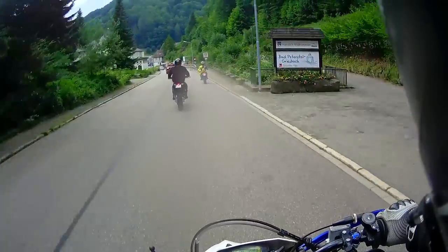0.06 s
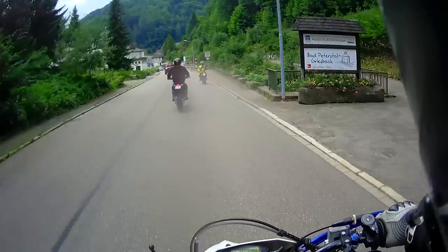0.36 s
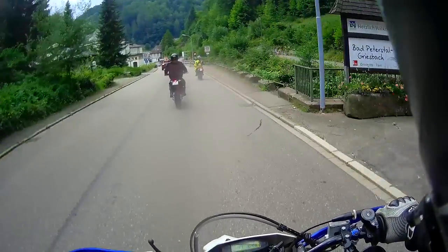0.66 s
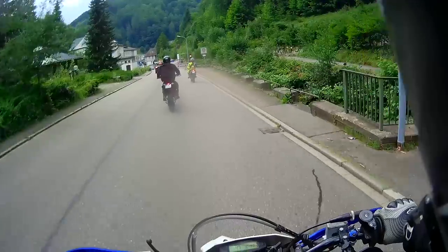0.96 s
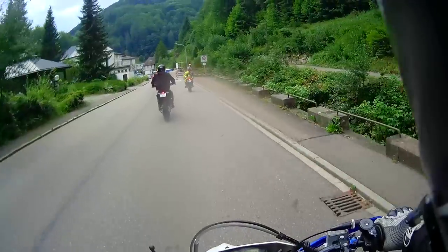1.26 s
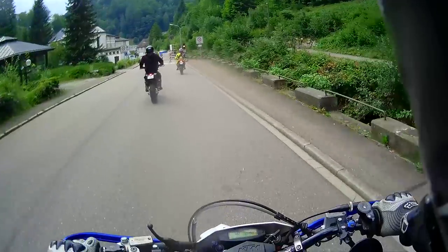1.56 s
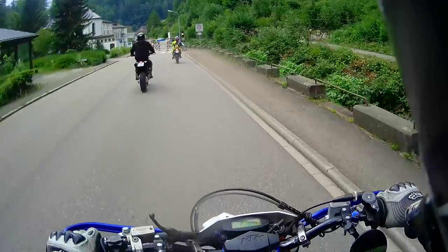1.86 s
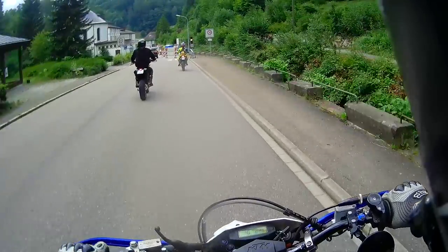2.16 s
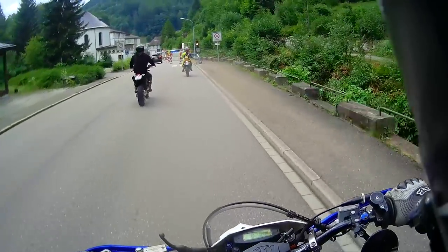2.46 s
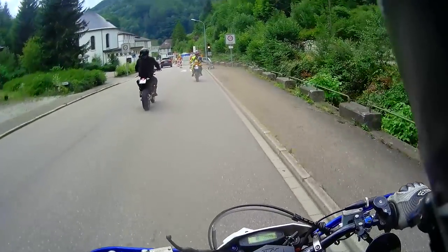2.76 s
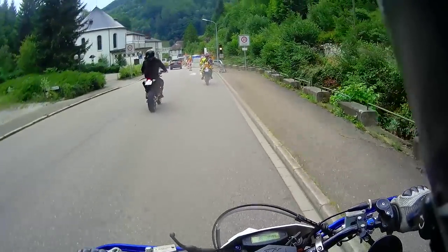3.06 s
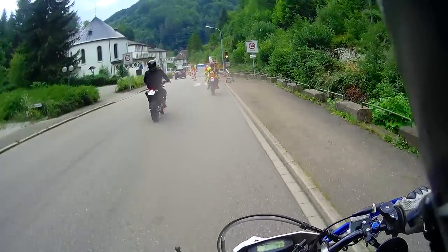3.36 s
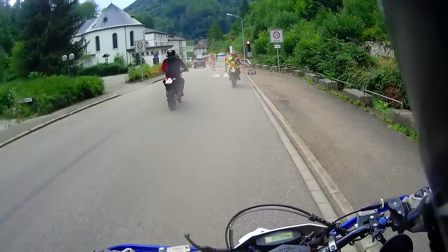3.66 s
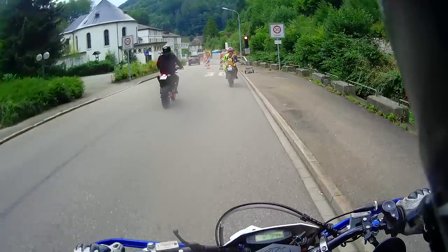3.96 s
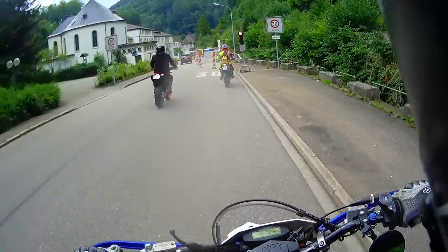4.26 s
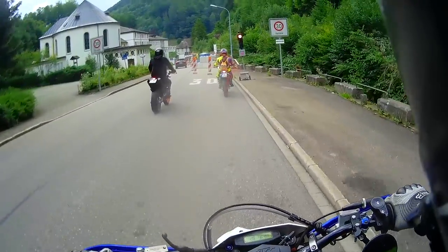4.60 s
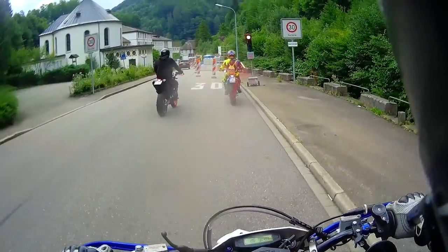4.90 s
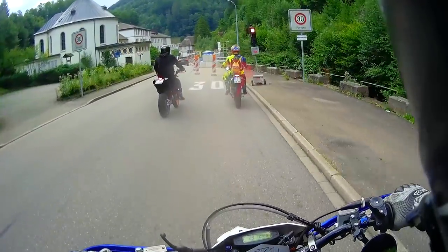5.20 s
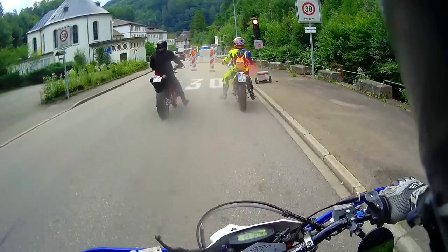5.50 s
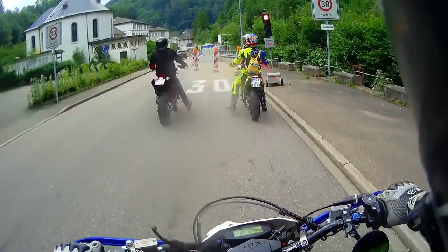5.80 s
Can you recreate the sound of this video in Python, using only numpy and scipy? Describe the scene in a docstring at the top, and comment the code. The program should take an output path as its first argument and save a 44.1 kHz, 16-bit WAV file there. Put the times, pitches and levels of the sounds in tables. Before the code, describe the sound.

Wind rumbles around a helmet microphone over the close, pulsing exhaust of a motorcycle riding slowly down a street. The engine dips, bangs twice as it picks up, and then gradually loses speed, its valves and chain clattering lightly. Brief revs and a thin, faint whine come from a second bike in front. The throttle shuts and the engine settles into a slow, thumping idle alongside the other machine.

```python
"""A steady exhaust beat and a rumble of wind: a single-cylinder four-stroke motorcycle cruises, heard
from the rider's helmet. The throttle opens with two sharp bangs, then the engine runs down and idles.
Each firing is a pulse of gas that rings the resonances of the pipes, over the rattle of valves and chain.
A motorcycle just ahead blips its throttle, whines from its gears as it slows, and idles."""
import sys
import numpy as np
from scipy import signal
from scipy.fft import rfft, irfft, next_fast_len
from scipy.io import wavfile
from scipy.ndimage import map_coordinates

SR = 44100
rng = np.random.default_rng(int(sys.argv[2]) if len(sys.argv) > 2 else 0)


def persist_wave(psi):
    """Save psi, clipped to +-1, as 16-bit WAV."""
    counts = np.round(np.clip(psi, -1, 1) * 32767).astype(np.int16)
    wavfile.write(sys.argv[1], SR, np.atleast_2d(counts).T)


N = 266364
TIME = np.arange(N) / SR


def amp(db):
    """The decibel scale: 20 dB is a factor of ten in amplitude."""
    return 10 ** (np.asarray(db) / 20)


def unit(x):
    """Normalisation to an rms of 1."""
    return x / np.sqrt(np.mean(x ** 2) + 1e-20)


def curve(rows, at=TIME):
    """Linear interpolation between (time, value) rows."""
    return np.interp(at, *np.transpose(rows))


def wobble(rate):
    """Slow random modulation: a spline through rate random knots a second."""
    return map_coordinates(rng.standard_normal(int(N * rate / SR) + 4), [TIME * rate])


def filtered(x, response):
    """Linear filtering: the spectrum of x is multiplied by a frequency response."""
    size = next_fast_len(N + SR // 2)
    return irfft(rfft(x, size) * response(np.fft.rfftfreq(size, 1 / SR)), size)[:N]


def colour(x, spectrum):
    """Spectral shaping by (Hz, dB) points joined on a logarithmic frequency axis."""
    hz, db = np.transpose(spectrum)
    return filtered(x, lambda f: amp(np.interp(np.log(f + 1), np.log(hz), db)))


def ring(x, modes, order=1):
    """Superposition of (Hz, width Hz, dB) resonances; a higher order deepens the valleys between."""
    return filtered(x, lambda f: sum(
        amp(db) * (1j * f * width / (hz * hz - f * f + 1j * f * width)) ** order
        for hz, width, db in modes))


def noise(spectrum):
    """Coloured noise: white noise shaped to a spectrum, at an rms of 1."""
    return unit(colour(rng.standard_normal(N), spectrum))


def puffs(times, sizes, widths):
    """A train of Gaussian pulses; widths are standard deviations in seconds."""
    index = np.round(times * SR).astype(int)[:, None] + np.arange(-SR // 100, SR // 100)
    offset = (index / SR - times[:, None]) / np.reshape(widths, (-1, 1))
    bells = np.reshape(sizes, (-1, 1)) * np.exp(-.5 * offset ** 2)
    inside = (index >= 0) & (index < N)
    return np.bincount(index[inside], bells[inside], N)


def fading(x, life_s):
    """Exponential decay: every pulse gains a tail that falls to 1/e in life_s."""
    keep = np.exp(-1 / (life_s * SR))
    return signal.lfilter([1 - keep], [1, -keep], x)


# Engine speed. Each row: time in seconds, firing rate in Hz.
FIRING_RATE = [(0, 31.56), (0.91, 29.51), (1.19, 29.19), (1.41, 26.17), (1.55, 37.05), (1.68, 39.86),
               (2.98, 33.6), (3.8, 29.1), (4.13, 24.37), (4.41, 17.01), (4.77, 13.32), (6.04, 12.57)]
def revs(cruise_hz=32):
    """Engine speed as a frequency ratio, in octaves above cruise."""
    return np.log2(curve(FIRING_RATE) / cruise_hz)


# Spectrum of the wind. Each row: frequency in Hz, relative level in dB.
WIND_SPECTRUM = [(15, -8), (35, -1), (70, 0.5), (130, -1), (250, -2), (340, -7), (460, -16), (580, -30.5),
                 (1000, -32.5), (3000, -62)]
def wind(cruise_db=-37.5, db_per_octave=8, gust_db=2):
    """Flow noise: air and road rumble round the helmet, dropping as the engine slows."""
    return amp(cruise_db + db_per_octave * revs() + gust_db * wobble(14)) * noise(WIND_SPECTRUM)


# Surges of gear whine ahead. Each row: time of the top in seconds, pitch there in Hz,
# length of the fall in seconds, level in dB.
WHINE_SURGES = [(2.84, 1175, 0.22, -57), (3.92, 1175, 0.3, -56), (4.26, 1115, 0.38, -58),
                (5.24, 1229, 0.7, -57.5)]
def surges(rise_hz_per_s=400, sink_hz_per_s=280, rise_share=0.55, fade_db=10):
    """Frequency glides: each surge climbs, then sinks and fades; the loudest sets pitch and level."""
    top_s, top_hz, fall_s, top_db = np.transpose(WHINE_SURGES)[:, :, None]
    before, after = np.maximum(top_s - TIME, 0), np.maximum(TIME - top_s, 0)
    hz = top_hz - rise_hz_per_s * before - sink_hz_per_s * after
    db = top_db - fade_db * ((before / rise_share + after) / fall_s) ** 2
    return np.choose(db.argmax(axis=0), hz), db.max(axis=0)


def whine_ahead(sideband_db=-4.5, spacing_hz=38, shimmer_db=2.8, drone_db=1, octave_db=-19):
    """Modulation sidebands: the gears ahead sing in a cluster of close lines over an exhaust drone."""
    hz, db = surges()
    mesh = 2 * np.pi * np.cumsum(hz * (1 + .014 * wobble(220))) / SR
    turn = 2 * np.pi * np.cumsum(spacing_hz * hz / np.average(hz, weights=amp(db))) / SR
    lines = sum(np.sin(mesh + k * turn + 0.93 * wobble(14))
                * amp(sideband_db * abs(k) + shimmer_db * wobble(20)) for k in range(-3, 4))
    song = unit(lines + amp(octave_db) * np.sin(2 * mesh))
    drone = sum(np.sin(k * turn + rng.uniform(0, 2 * np.pi)) * amp(4.8 * wobble(6))
                for k in range(8, 13))
    return amp(db) * (song + amp(drone_db) * unit(drone))


# Throttle blips ahead. Each row: centre in seconds, length in seconds, pitch in Hz, level in dB.
THROTTLE_BLIPS = [(2.335, 0.043, 287.5, -35), (2.634, 0.12, 276.8, -36.5), (3.765, 0.1, 234, -35),
                  (4.2, 0.15, 249.6, -46.5), (4.938, 0.12, 247, -37), (5.128, 0.1, 248.6, -37.5)]
def blips_ahead(burble=0.59, overtone_db=-13, rough_db=-9):
    """Amplitude modulation: the exhaust ahead burbles briefly at each twist of its throttle."""
    out = np.zeros(N)
    gas = noise([(100, -20), (200, 3.0), (290, 14.5), (450, -20.0), (600, -23), (1500, -48)])
    for centre, length, hz, db in THROTTLE_BLIPS:
        phase = 2 * np.pi * np.cumsum(hz * (1 + 0.03636 * wobble(60))) / SR
        firing = 1 + burble * np.sin(phase / 5)
        note = firing * (np.sin(phase) + amp(overtone_db) * np.sin(1.8 * phase) + amp(rough_db) * gas)
        out += amp(db) * np.exp(-((TIME - centre) / (length / 2)) ** 4) * unit(note)
    return out


# Tone of both exhausts. Each row: frequency in Hz, gain in dB.
THUMP_RESPONSE = [(20, -29), (32, -21), (50, -5.5), (75, -4), (110, -2), (160, -3), (300, 1.5), (450, 4),
                  (650, -5.5), (1200, 17)]
def thump(flow):
    """Source and filter: a fixed response shapes pulses of flow into exhaust thumps."""
    return colour(flow, THUMP_RESPONSE)


# Modes of the silencer ahead. Each row: frequency in Hz, bandwidth in Hz, gain in dB.
AHEAD_MODES = [(123, 33, -4), (217.5, 37, 6.5), (336, 78, 1)]
def idle_ahead(rate_hz=13.24, second_beat=0.87, near_s=4.95, near_db=-30, approach_db_per_s=29):
    """Pulse-driven resonance: double beats ring the silencer ahead, louder as it comes near."""
    times = np.arange(4.342, 6.04, 1 / rate_hz)
    level_db = near_db - approach_db_per_s * np.maximum(near_s - times, 0)
    size = amp(level_db + rng.standard_normal(len(times)))
    flow = puffs(times, size, 0.00099) + puffs(times + 0.0141, size * second_beat, 0.0012)
    return thump(flow + ring(flow, AHEAD_MODES))


# Spectrum of the clatter. Each row: frequency in Hz, relative level in dB.
CLATTER_SPECTRUM = [(200, -23), (550, -6), (830, 0), (1130, 0), (1300, -2.5), (1500, -3), (1750, -6.5),
                    (2150, -17), (2600, -13.5), (3600, -24), (6000, -33.5), (12000, -71)]
def clatter(cycle, cruise_db=-54.5, db_per_octave=5.5, depth_db=2, grain_db=2.0):
    """Modulated noise: valve gear and chain rattle with each turn of the crank, louder at speed."""
    beat = amp(depth_db * np.cos(4 * np.pi * cycle) + grain_db * wobble(170))
    return amp(cruise_db + db_per_octave * revs()) * unit(beat * noise(CLATTER_SPECTRUM))


# Slaps of the drive chain. Each row: time in seconds, level in dB.
CHAIN_SLAPS = [(1.543, -28.5), (1.573, -26), (2.042, -32), (2.495, -38.5), (2.777, -35.5), (3.427, -35.5),
               (4.244, -40.5), (5.7, -46.5), (5.778, -50), (6.002, -48)]
def chain(gain_db=6, life_s=0.0054):
    """Damped impacts: the slack chain slaps its guide in short bursts of noise."""
    times, db = np.transpose(CHAIN_SLAPS)
    clack = noise([(300, -45), (600, -0.5), (900, 2.0), (1300, -4.5),
                   (2000, -17.5), (3300, -21), (4200, -39), (9000, -62)])
    return fading(puffs(times, amp(db + gain_db), 0.00096), life_s) * clack


# Engine load. Each row: time in seconds, level of an ordinary firing in dB.
ENGINE_LOAD = [(0, -16.5), (1.1, -17.5), (1.42, -20), (1.62, -15), (2.4, -16), (3.25, -16.5), (3.8, -19.5),
               (4.33, -23), (4.52, -29.5), (4.9, -25.5), (6.04, -23.5)]
def airbox(cycle, tuned_hz=153, half_width_hz=17, hum_db=-16, waver_db=1.7, build_s=0.083):
    """Forced resonance: the intake drone builds as the 4th or 5th firing harmonic nears its tuning."""
    rate = curve(FIRING_RATE)
    drone = np.zeros(N)
    for harmonic, weight in (4, 1), (5, .4):
        match = 1 / (1 + ((harmonic * rate - tuned_hz) / half_width_hz) ** 2)
        drone += weight * np.cos(2 * np.pi * harmonic * cycle) * fading(match, build_s)
    return amp(curve(ENGINE_LOAD) + hum_db + waver_db * wobble(12)) * drone


def knocks(times, period, idle, ignition_db=-30, piston_db=-34, scatter_db=4.0):
    """Structure-borne sound: the piston shakes the cases at ignition, and at idle again going down."""
    chance = amp(scatter_db * rng.standard_normal((len(times), 2)))
    ignition = puffs(times - period / 4, amp(ignition_db) * chance[:, 0], 0.001)
    return ignition + puffs(times - period / 10, amp(piston_db) * chance[:, 1] * idle, 0.0012)


# Modes of header pipe and engine cases. Each row: frequency in Hz, bandwidth in Hz, gain in dB.
METAL_MODES = [(732, 92, 9.5), (845, 190, 16.5), (995, 87, -17), (1454, 87, 6), (1562, 166, 9.5),
               (2518, 174, 2), (2796, 580, -6), (4110, 120, -9), (5260, 350, -49)]
def rasp(times, rasp_db, rush_db=-13, tail_db=-10, life_s=0.0079):
    """Noise-driven resonance: gas rushes through the header at each stroke and rings the metal."""
    gate = puffs(times - .0003, amp(rasp_db), 0.0022)
    envelope = amp(rush_db) * gate + amp(tail_db) * fading(gate, life_s)
    return envelope * unit(ring(rng.standard_normal(N), METAL_MODES, order=2))


# Barking modes of the header pipe. Each row: frequency in Hz, bandwidth in Hz, gain in dB.
HEADER_MODES = [(960, 700, 1.5), (1468, 340, 7), (2652, 310, 0), (3950, 350, -44), (5260, 360, -13)]
def bark(times, rasp_db, gain_db=11, vary_db=3.5):
    """Impulse response: each stroke rings the header's modes in a different balance."""
    sizes = amp(rasp_db[:, None] + gain_db + vary_db * rng.uniform(-1.1, 1, (len(times), len(HEADER_MODES))))
    starts = times[:, None] - rng.uniform(0.00048, 0.001502, sizes.shape)
    return sum(ring(puffs(starts[:, k], sizes[:, k], .00005), [mode], order=2)
               for k, mode in enumerate(HEADER_MODES))


# Spectrum of a bang's spit. Each row: frequency in Hz, relative level in dB.
SPIT_SPECTRUM = [(500, -20), (1400, 5), (2050, -1), (2600, 9), (3400, -5), (4050, 2), (4700, -12),
                 (5350, -1.5), (7000, -10), (14000, -25)]
def spit(times, rasp_db, gain_db=-16):
    """Nonlinear growth: treble rises as the cube of the rasp, so only the hardest bangs spit."""
    violence = amp(rasp_db - np.max(rasp_db)) ** 2
    return puffs(times, amp(rasp_db + gain_db) * violence, 0.0013) * noise(SPIT_SPECTRUM)


def bang_ring(times, size, excess_db, hz=235, width_hz=60, ring_db=3):
    """Free vibration: a charge that burns harder than usual leaves the silencer ringing."""
    blow = puffs(times - .0005, size * np.clip((excess_db - 1) / 5, 0, 1), 0.0003)
    return ring(blow, [(hz, width_hz, ring_db)])


# Firings that bang or crack. Each row: time in seconds, thump level in dB, rasp level in dB.
HARD_FIRINGS = [(0.316, -16.5, -36.5), (0.511, -14.5, -35), (0.879, -16, -38), (0.911, -17.5, -36),
                (1.014, -15.5, -32), (1.472, -8, -21), (1.502, -10.5, -24.5), (1.763, -12, -31),
                (1.814, -11.5, -29.5), (1.891, -12, -29.5), (1.968, -11.5, -26.5), (2.18, -11.5, -26.5),
                (2.342, -12, -36), (2.423, -13, -36), (2.705, -13, -33.5), (2.762, -15, -34.5),
                (3.334, -15.5, -36.5), (3.83, -20.5, -39), (4.264, -19, -45)]
def firings(cycle, scatter_db=1.48, rebound=0.65, lean_db=1.5, lead_s_per_db=0.00018,
            cruise_load_db=-17, cruise_rasp_db=-42.5, rasp_scatter_db=2.1):
    """Cycle-to-cycle variation: a harder burn thumps louder, rasps more and arrives earlier."""
    times = np.interp(np.arange(1, int(cycle[-1]) + 1), cycle, TIME)
    usual_db = curve(ENGINE_LOAD, times)
    chance = rng.standard_normal((len(times), 2))
    burn = signal.lfilter([1], [1, rebound], chance[:, 0])  # a poor burn leaves fuel for the next
    burn_db = scatter_db * np.clip(burn, -2, 1.2)
    bangs = [np.argmin(abs(times - s)) for s, _, _ in HARD_FIRINGS]
    burn_db[np.subtract(bangs, 1)] = -lean_db  # so a weak stroke comes before a bang
    thump_db = usual_db + burn_db
    rasp_db = cruise_rasp_db + 1.9 * (usual_db - cruise_load_db) + 1.06 * burn_db
    rasp_db += rasp_scatter_db * np.minimum(chance[:, 1], 1)
    _, thump_db[bangs], rasp_db[bangs] = np.transpose(HARD_FIRINGS)
    excess_db = thump_db - usual_db
    return times - lead_s_per_db * np.clip(excess_db, -4, 4), thump_db, rasp_db, excess_db


def exhaust(times, size, widths, excess_db, idle, suck_db=-8, suck_delay=3.5, gulp=0.21):
    """Compression and rarefaction: a dip, a push and a suck back; at idle the suck is most of it."""
    dip = puffs(times - .0019, size * np.clip(gulp + 0.022 * excess_db, 0, 1), widths)
    push = puffs(times, size * (1 - idle), widths)
    suck_times = times + suck_delay * widths * (1 - 0.44 * idle)
    suck = puffs(suck_times, size * (amp(suck_db) + 0.34 * idle), widths * 1.005)
    return push - suck - dip


# Modes of silencer and airbox. Each row: frequency in Hz, bandwidth in Hz, gain in dB.
SILENCER_MODES = [(166, 44, -7.5), (269.6, 25, -9), (368, 270, -22)]
def engine(cycle, shut_s=3.95, closing_s=0.27, base_width_s=0.00093, stretch=0.24, sharpen=0.27,
           push_db=2.0, boom_hz=84, boom_width_hz=45, boom_db=2):
    """Periodic excitation: a knock, then half a turn later an exhaust pulse, rings the silencer."""
    times, thump_db, rasp_db, excess_db = firings(cycle)
    rate = curve(FIRING_RATE, times)
    idle = np.clip((times - shut_s) / closing_s, 0, 1)  # 1 once the throttle is shut
    # a slow crank opens the valve slowly; harder burns leave in steeper fronts
    widths = base_width_s * (32 / np.maximum(rate, 17)) ** stretch * amp(-sharpen * excess_db)
    gas = exhaust(times, amp(thump_db + push_db), widths, excess_db, idle)
    flow = gas + knocks(times, 1 / rate, idle)
    # at low speed the long gulps of gas also rock the silencer's deepest mode
    slow = np.clip((30.5 - curve(FIRING_RATE)) / 4, 0, 1)
    boom = ring(gas * slow, [(boom_hz, boom_width_hz, boom_db)])
    bangs = bang_ring(times, amp(thump_db), excess_db)
    header = rasp(times, rasp_db) + bark(times, rasp_db) + spit(times, rasp_db)
    return thump(flow + ring(flow, SILENCER_MODES) + boom + bangs) + header + airbox(cycle)


def scene():
    """Superposition: both machines and the wind add at the helmet, in one channel."""
    cycle = np.cumsum(curve(FIRING_RATE)) / SR + .15  # engine cycles, two crank turns each
    ridden = engine(cycle) + clatter(cycle) + chain()
    return (ridden + blips_ahead() + whine_ahead() + idle_ahead() + wind())[None]


def record(dry, hiss_db=-63.0, top_hz=15800):
    """Noise floor and band limit: an even hiss is added, and nothing above top_hz passes."""
    return filtered(dry[0] + amp(hiss_db) * rng.standard_normal(N), lambda hz: hz < top_hz)[None]


dry = scene()
out = record(dry)
persist_wave(out)
```